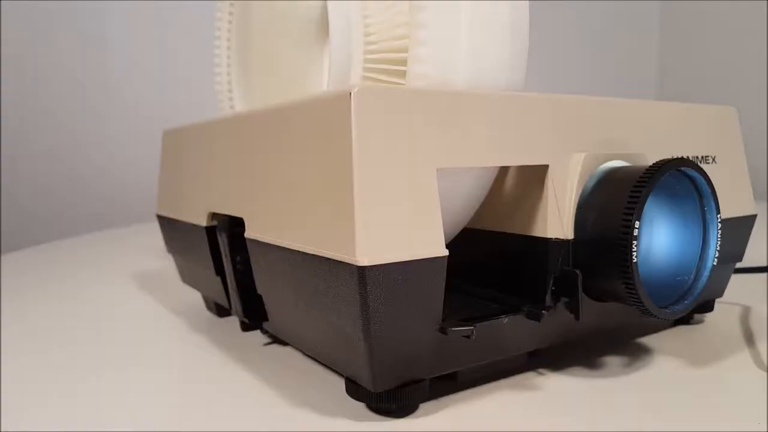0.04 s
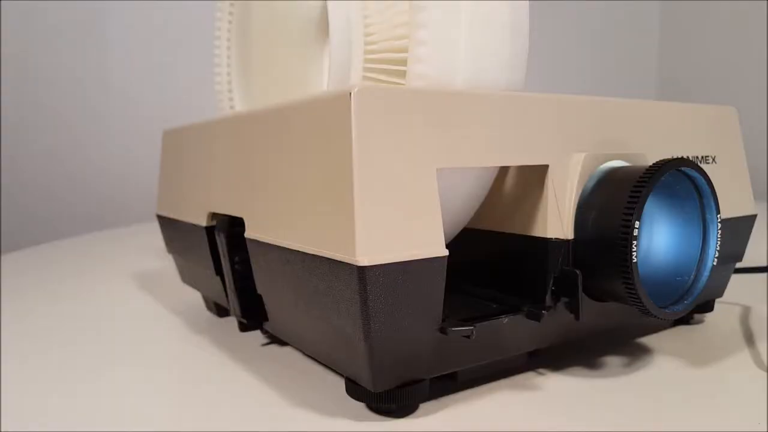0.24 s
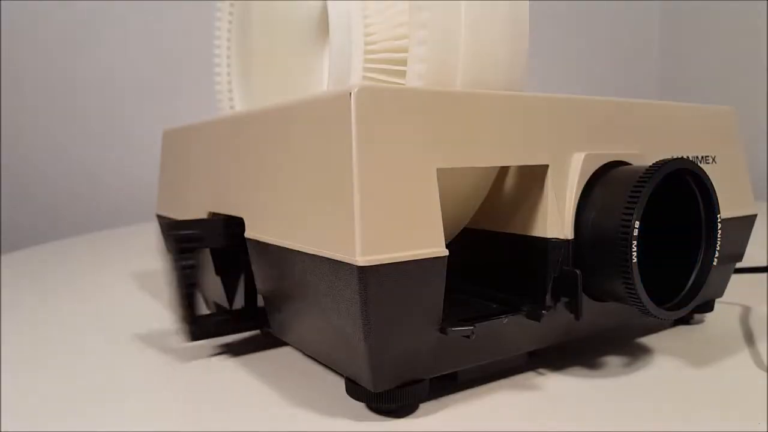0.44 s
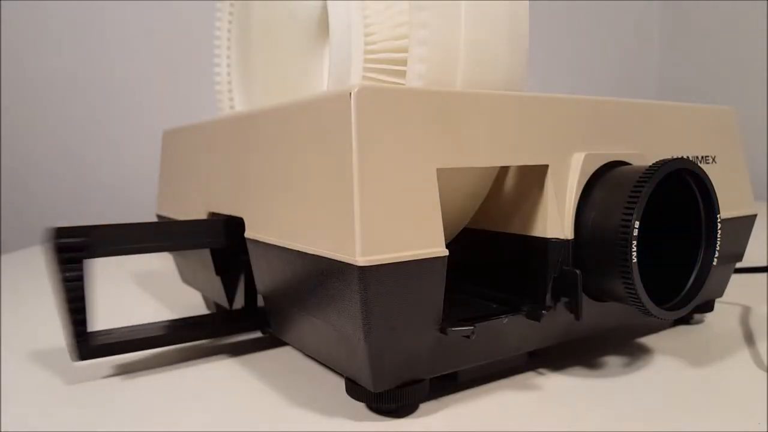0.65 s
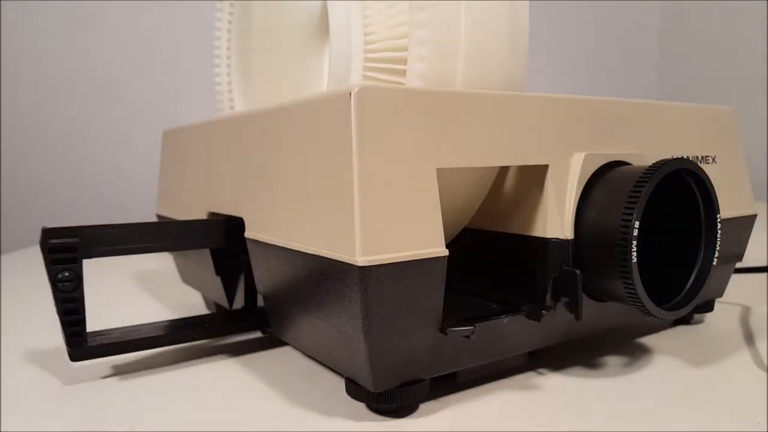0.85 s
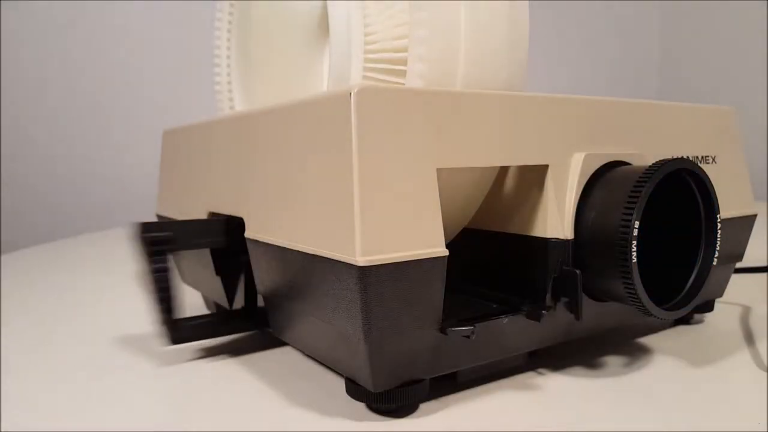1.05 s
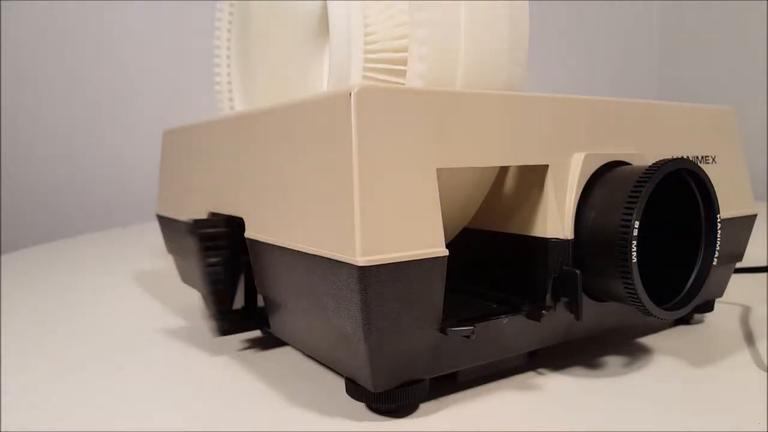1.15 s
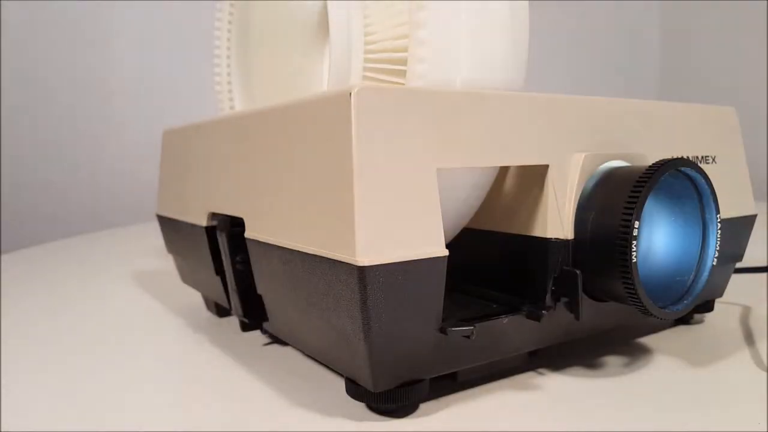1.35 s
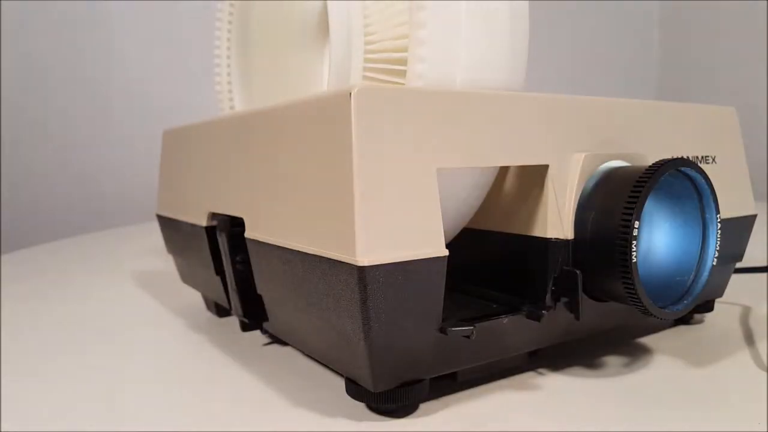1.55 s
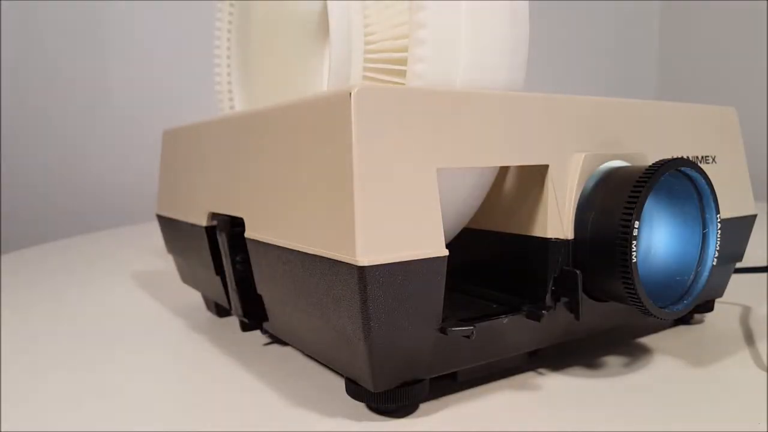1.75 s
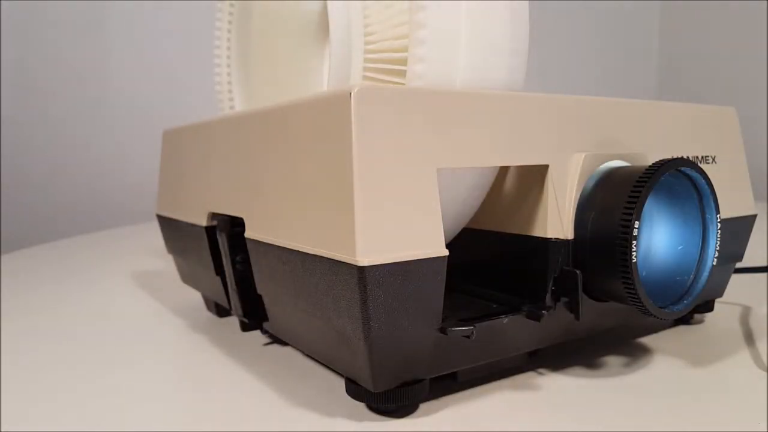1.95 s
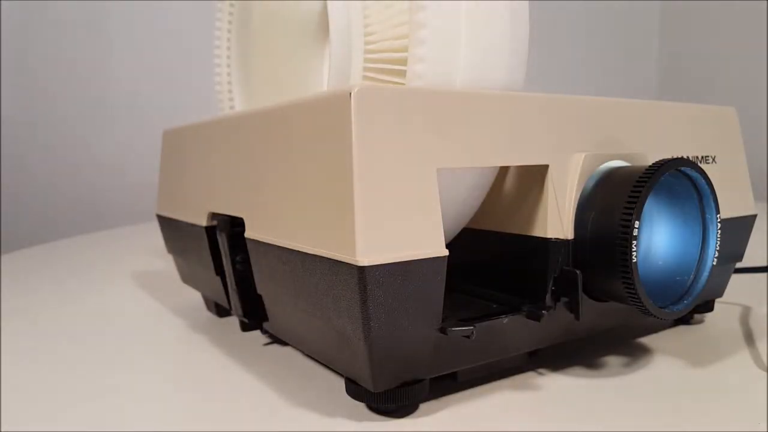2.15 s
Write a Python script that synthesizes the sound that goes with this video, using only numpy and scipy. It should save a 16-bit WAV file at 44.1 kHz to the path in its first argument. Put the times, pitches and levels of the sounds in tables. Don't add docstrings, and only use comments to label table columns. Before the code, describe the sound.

A slide projector on a table, miked closely in stereo in a small room: steady quiet fan, then a click, gritty motor whirr, a dense burst of loud plastic clacks, a pause, and a final clatter.

```python
import sys
import numpy as np
from scipy import signal
from scipy.fft import rfft, irfft
from scipy.io import wavfile

SR = 44100
rng = np.random.default_rng(int(sys.argv[2]) if len(sys.argv) > 2 else 0)


def unload_audio(sound):
    columns = np.transpose(np.atleast_2d(sound))
    steps = np.round(np.clip(columns, -1, 1) * 32767)
    wavfile.write(sys.argv[1], SR, steps.astype(np.int16))


def attenuation_scalar(level_db):
    decades = np.asarray(level_db, float) / 20
    return 10 ** decades


N = 97020
MIDDLE = np.array([[1], [0]])


def unit_rms(x):
    return x / np.sqrt(np.mean(x ** 2) + 1e-20)


def unit_peak(x):
    return x / np.max(abs(x[0]))


def noise(count):
    return rng.standard_normal((2, count))


def sine(hz, t, phase=0):
    return np.sqrt(2) * np.sin(2 * np.pi * (hz * t + phase))


def read_curve(points, hz):
    f, value = np.transpose(points)
    return np.interp(np.log(hz + 1), np.log(f + 1), value)


def colour(x, db_of):
    hz = np.fft.rfftfreq(x.shape[-1], 1 / SR)
    return irfft(rfft(x) * attenuation_scalar(db_of(hz)), x.shape[-1])


def low_pass(x, edge_hz):
    return colour(x, lambda hz: -10 * np.log10(1 + (hz / edge_hz) ** 4))


def with_resonances(slope, peaks):
    def db_of(hz):
        humps = sum(db / (1 + (2 * (hz - f) / width) ** 2) for f, width, db in peaks)
        return read_curve(slope, hz) + humps
    return db_of


def ring(x, hz, width_hz):
    r = np.exp(-np.pi * width_hz / SR)
    turn = 2 * np.pi * min(hz, SR / 2.2) / SR
    return signal.lfilter([1 - r, 0, r - 1], [1, -2 * r * np.cos(turn), r * r], x)


def band(x, lo_hz, hi_hz):
    return signal.sosfilt(signal.butter(2, [lo_hz, hi_hz], "band", fs=SR, output="sos"), x)


def wander(rate_hz):
    return unit_rms(ring(rng.standard_normal(N), rate_hz, 2 * rate_hz))


def gate(t, start_s, end_s, rise_s, fall_s):
    return np.clip(np.minimum((t - start_s) / rise_s, (end_s - t) / fall_s), 0, 1)


# t/s, friction level/dB, table drone level/dB
MOTOR_RUN = [(0.229, -47, -51), (.29, -47, -54.5), (.35, -46.5, -58), (.49, -43.5, -57.5),
             (.53, -45.5, -71), (.76, -44, -66), (.78, -37.5, -47.5), (.86, -41.5, -49), (.915, -42, -50),
             (.95, -43.5, -50), (.99, -44, -44), (1.04, -46.5, -63), (1.065, -45.5, -44),
             (1.16, -45.5, -48), (1.21, -43.5, -68), (1.33, -40.5, -55.5), (1.431, -47.5, -52.5)]
SPIN_UP_S, COAST_S = 0.027, 0.015


def motor_speed(t):
    return gate(t, MOTOR_RUN[0][0], MOTOR_RUN[-1][0], SPIN_UP_S, COAST_S) ** 2


def gear_grit():
    per_s, spread_db, decay_s = 1500, 4.5, 0.003
    sizes = attenuation_scalar(spread_db * np.minimum(rng.exponential(1, N), 2.5))
    contacts = sizes * (rng.random(N) < per_s / SR)
    return unit_rms(signal.lfilter([1], [1, -np.exp(-1 / (decay_s * SR))], contacts))


# f/Hz, level per Hz/dB
WHIRR_SLOPE = [(120, -61), (200, -2), (635, -6.5), (709, -3), (1350, -4.5), (2090, -7.5), (5130, -20),
               (12400, -28), (16000, -34)]
# f/Hz, width/Hz, lift/dB
GEARBOX = [(994, 670, 5), (1330, 52, 5.5), (1750, 460, 4.5), (2364, 103, 7.5), (3900, 990, 3),
           (6480, 250, 6)]
# start t/s, end t/s, lift/dB
SLIDES = [
    (0.345, 0.486, 8.5),
    (.77, 0.986, -0.5),
    (1.18, 1.44, 0),
]


def friction():
    t = np.arange(N) / SR
    grit_share, lurch_db = .5, .8
    rubbing = noise(N) * (1 - grit_share + grit_share * gear_grit())
    rub = colour(rubbing, with_resonances(WHIRR_SLOPE, GEARBOX))
    rub /= np.std(band(rub, 1500, 5000))
    low, below_treble = low_pass(rub, 2100), low_pass(rub, 5200)
    middle, treble = below_treble - low, rub - below_treble
    s, rub_db, _ = np.transpose(MOTOR_RUN)
    slide_db = sum(db * gate(t, a, b, 0.0021, 0.04) for a, b, db in SLIDES)
    rub = low * gate(t, s[0], s[-1], .001, COAST_S)
    rub = rub + motor_speed(t) * (attenuation_scalar(slide_db) * middle + treble)
    return rub * attenuation_scalar(np.interp(t, s, rub_db) + lurch_db * wander(rate_hz=18))


def drone():
    t = np.arange(N) / SR
    s, _, drone_db = np.transpose(MOTOR_RUN)
    return MIDDLE * sine(134, t) * attenuation_scalar(np.interp(t, s, drone_db)) * motor_speed(t)


def whine():
    t = np.arange(N) / SR
    hz, width_hz, db = 12400, 320, -68
    tone = unit_rms(ring(ring(noise(N), hz, width_hz), hz, width_hz)) * attenuation_scalar(db)
    return tone * (gate(t, .57, 1.2, .03, .05) + .55 * motor_speed(t))


def rattle(length_s, shape, clumps_db=1.0):
    t = np.arange(0, .25, 1 / SR)
    steps = np.repeat(rng.standard_normal(len(t) // 32 + 1), 32)[:len(t)]
    clumps = np.where(t > .001, steps, 1)
    return noise(len(t)) * attenuation_scalar(clumps_db * clumps) * np.exp(-(t / max(length_s, .001)) ** shape)


# t/s, level/dB, treble level/dB, ring f/Hz, rattle length/s
TICKS = [(.2158, -48.5, 2.5, 4470, 0.00066), (.2538, -47, -8, 3980, 0.0015),
         (.2715, -37.5, -5, 4300, 0.0046), (.3048, -23, -8.5, 3900, 0.0035),
         (.4603, -18.5, -11, 4300, 0.0018), (.4785, -28.5, -12, 3670, 0.0044),
         (.5612, -25.5, -6.5, 4300, 0.0057), (.7667, -28, -7.5, 3200, 0.0054),
         (.8063, -15.5, -16, 2690, 0.0031), (.8195, -24, -28, 3560, 0.0043),
         (.8305, -21.5, -13, 3270, 0.009), (.8462, -16, -12.5, 3200, 0.0087), (.9, -28.5, -28, 4100, 0.025),
         (.9168, -18, -7.5, 3630, 0.0075), (.9905, -23, -14, 2780, 0.0056),
         (1.0628, -29, -12, 3440, 0.0036), (1.077, -45, 7, 4000, 0.011), (1.277, -20.5, -8, 4350, 0.003),
         (1.2888, -29.5, -2.5, 2970, .004), (1.301, -29, -20, 4330, 0.0035),
         (1.342, -26.5, -3, 3250, 0.0051), (1.358, -26, -10, 3600, 0.0032),
         (1.3865, -18.5, -7.5, 3420, 0.0056)]


def tick(db, top_db, hz, length_s):
    x = rattle(length_s, 1.3)
    crackle = band(ring(x, hz, 800) + .35 * x, 1500, 5300)
    body = unit_peak(band(crackle, 1200, 5300))
    edge = band(x + .3 * rattle(4 * length_s, 2), 5500, 14500)
    fizz = unit_peak(band(edge, 3000, min(3.4 * hz, 15000)))
    return attenuation_scalar(db - 2) * (body + attenuation_scalar(top_db) * fizz)


def modes(x, table, centre_hz):
    detune, spread_db, focus_db_per_oct = .02, 2.5, 8
    total = 0
    for hz, db, t60 in table:
        level_draw, pitch_draw = rng.standard_normal(2)
        level_db = db + spread_db * level_draw - focus_db_per_oct * abs(np.log2(hz / centre_hz))
        mode = ring(x, hz * (1 + detune * pitch_draw), 1.32 / t60)
        total = total + attenuation_scalar(level_db) * np.sqrt(t60) * mode
    return total


# f/Hz, level/dB, t60/s
PANELS = [(980, -2, .03), (1150, -4, .03), (1290, 0, .035), (1470, -1, .03), (1610, -1, .035),
          (1900, -4, .03), (2330, -4, .025), (2670, -7, .025)]
# f/Hz, level/dB, t60/s
SHELL = [(210, -15, .06), (335, -4, .06), (410, 0, .07), (474, -5, .06), (640, -3, .05), (750, -5, .04)]
# t/s, level/dB, thud level/dB, panel f/Hz, rattle length/s
CLACKS = [(.230, -32, 1.5, 1580, 0.0047), (.272, -19.5, -8.5, 1580, 0.01), (.305, -25, -5.5, 1650, 0.0053),
          (.685, -29, -18, 1190, 0.0029), (.708, -23, -25, 1360, 0.0093), (.767, -14.5, -4.5, 990, 0.014),
          (.807, -20, -20, 1300, 0.0093), (.820, -31, -5, 1320, 0.014), (.832, -25.5, -6, 1650, 0.0061),
          (.848, -11.5, -11.5, 1310, 0.0032), (.900, -24, -7, 1400, 0.028),
          (.918, -10.5, -11, 1670, 0.0055), (.991, -22, -9, 2330, 0.0093), (1.301, -21, -1, 1580, .008),
          (1.3415, -13.5, -10, 1420, 0.01), (1.388, -23, 0, 1520, 0.0053),
          (1.399, -18.5, -17, 1500, 0.0068)]


def clack(db, thud_db, hz, length_s):
    x = band(rattle(length_s, 2.07), 178, 3000)
    panels = unit_peak(band(modes(x, PANELS, hz) + 0.046 * x, 670, 2950))
    thud = unit_peak(band(modes(x, SHELL, 570), 115, 600))
    return attenuation_scalar(db - 6) * (panels + attenuation_scalar(thud_db) * thud)


# t/s, level/dB, ring f/Hz, t60/s
STRIKES = [(.272, -34.5, 1615, 0.058), (.3052, -34, 10800, 0.01), (.3052, -30, 2280, 0.011),
           (.354, -32, 2470, 0.036), (.449, -30.5, 3760, .015), (.4605, -28, 4650, 0.014),
           (.5615, -34.5, 10840, 0.012), (.5617, -29, 1820, 0.019), (1.025, -37.5, 399, 0.3),
           (1.3868, -21.5, 3300, 0.013), (.858, -39, 3350, 0.018), (.870, -39, 3400, 0.012),
           (.5615, -48, 4770, .015), (.7672, -14, 1890, 0.0057), (.769, -23, 418, 0.074),
           (.770, -29, 319, 0.033), (.774, -23, 974, 0.034), (.779, -33, 1520, 0.023),
           (.8065, -21, 2470, 0.013), (.8115, -21.5, 1310, .04), (.820, -32, 3400, .015),
           (.823, -29, 1500, 0.035), (.832, -25.5, 1880, .03), (.8455, -26, 2340, 0.015),
           (.8475, -15.5, 2298, 0.032), (.850, -18.5, 1280, 0.034), (.902, -35, 1366, 0.069),
           (.9175, -19, 1595, 0.02), (.920, -19.5, 1274, 0.019), (.928, -25.5, 1624, .05),
           (.930, -37, 359.4, 0.4), (.935, -38, 409.6, 0.29), (.946, -27, 1510, 0.027),
           (.948, -26.5, 635, 0.05), (.991, -27.5, 2323, 0.056), (1.002, -28, 2320, .02),
           (1.063, -30, 3600, 0.017), (1.2772, -23, 4640, 0.015), (1.290, -26, 2430, 0.017),
           (1.295, -39, 474, 0.95), (1.300, -28, 1600, 0.052), (1.341, -17.5, 1460, 0.033),
           (1.342, -28, 397, 0.11), (1.349, -21, 940, 0.035), (1.349, -24.5, 2330, 0.027),
           (1.360, -26.5, 614, 0.072), (1.3865, -22, 4145, 0.015), (1.387, -22, 2510, 0.032),
           (1.390, -24.5, 1070, 0.021), (1.401, -25.5, 1530, 0.024)]


def strike(db, hz, t60):
    t = np.arange(0, .5, 1 / SR)
    phase = 2 * np.pi * hz * t + np.array([[0], [np.pi / 2]])
    pair = np.sin(phase) + 0.26 * np.sin(1.07 * phase)
    return attenuation_scalar(db - 60 * t / t60) * pair * (1 - np.exp(-t * hz / 1.2))


# f/Hz, width/Hz, level/dB
GUIDE = [(4300, 860, 6), (6420, 89, 1.5), (7630, 560, 1.5), (9700, 210, 1), (14300, 400, -34.5)]
SQUEAK_START_S, SQUEAK_END_S = .711, 0.738


def squeak():
    length_s, slip_hz, db = SQUEAK_END_S - SQUEAK_START_S, 95, -42
    t = np.arange(0, length_s, 1 / SR)
    slips = noise(len(t)) * (.5 + abs(np.sin(np.pi * slip_hz * t)))
    guide = unit_rms(sum(attenuation_scalar(d) * unit_rms(ring(slips, f, w)) for f, w, d in GUIDE))
    return attenuation_scalar(db) * guide * np.sin(np.pi * t / length_s) ** 0.23


# t/s, level/dB, t60/s
THUMPS = [
    (.275, -49, .15),
    (.77, -53, .2),
    (.94, -52, .5),
    (1.04, -54, .5),
    (1.31, -50, .2),
    (1.385, -44, .25),
]


def thump(db, t60):
    t = np.arange(0, .25, 1 / SR)
    shake = unit_rms(band(band(noise(len(t)), 49, 128), 51, 123))
    return MIDDLE * attenuation_scalar(db - 60 * t / t60) * np.minimum(t / 0.0056, 1) * shake


def room(x):
    t60_s, top_hz, bottom_hz, db = 0.41, 9000, 150, -15
    t = np.arange(SR // 2) / SR
    tail = colour(noise(len(t)),
                  lambda hz: -10 * np.log10(1 + (hz / top_hz) ** 2 + (bottom_hz / (hz + 1)) ** 2))
    tail *= attenuation_scalar(-60 * t / t60_s) * (t > .004)
    return attenuation_scalar(db) * signal.fftconvolve(x, tail / np.linalg.norm(tail[0]), axes=1)[:, :N]


# f/Hz, level per Hz/dB
FAN_SLOPE = [(15, -63), (25, -26.5), (87, -11.5), (108, -9.5), (301, -8), (354, -2.5), (451, -11),
             (641, -7), (16000, -54)]
# f/Hz, width/Hz, lift/dB
DUCT = [(204.7, 20, 10), (406, 112, 6.5), (630, 32, 5.5), (1062, 303, 9), (2062, 290, 11), (3400, 860, 5)]


def fan_air():
    air = unit_rms(colour(noise(N), with_resonances(FAN_SLOPE, DUCT)))
    return air * attenuation_scalar(-46 + 0.12 * wander(rate_hz=22))


# f/Hz, rms level/dB
HUM = [(120, -62), (240, -63)]


def hum():
    t = np.arange(N) / SR
    return MIDDLE * sum(attenuation_scalar(db + 2 * wander(rate_hz=0.92)) * sine(hz, t, rng.random()) for hz, db in HUM)


def add(mix, start_s, sound):
    part = mix[:, round(start_s * SR):][:, :sound.shape[1]]
    part += sound[:, :part.shape[1]]


# f/Hz, side minus mid level/dB
WIDTH = [(40, -11), (110, -13), (200, -17), (380, -14.5), (700, -11), (1290, -5), (2380, -.5), (4400, -1),
         (8120, -.5), (15000, -1.5)]
# f/Hz, left minus right level/dB
TILT = [(60, -.5), (250, .5), (500, 0), (2000, -.5), (4400, -.5), (8120, 1), (13000, 3)]


def scene():
    changer = friction() + drone() + whine()
    for table, source in (TICKS, tick), (CLACKS, clack), (STRIKES, strike), (THUMPS, thump):
        for start_s, *settings in table:
            add(changer, start_s, source(*settings))
    add(changer, SQUEAK_START_S, squeak())
    mid, side = changer + room(changer) + fan_air() + hum()
    side = colour(side, lambda hz: read_curve(WIDTH, hz))
    left = colour(mid + side, lambda hz: read_curve(TILT, hz) / 2)
    right = colour(mid - side, lambda hz: -read_curve(TILT, hz) / 2)
    return np.array([left, right])


def top_cut(x):
    return signal.sosfilt(signal.butter(12, 16500, fs=SR, output="sos"), x)


def record(dry):
    start_s, edge_hz, ceiling = .0285, 15850, .4
    soft = ceiling * np.tanh(dry / ceiling)
    limited = colour(soft, lambda hz: -np.clip((hz - edge_hz) / 4, 0, 60))
    mix = limited * (np.arange(N) > start_s * SR)
    return top_cut(mix)


dry = scene()
out = record(dry)
unload_audio(out)
```